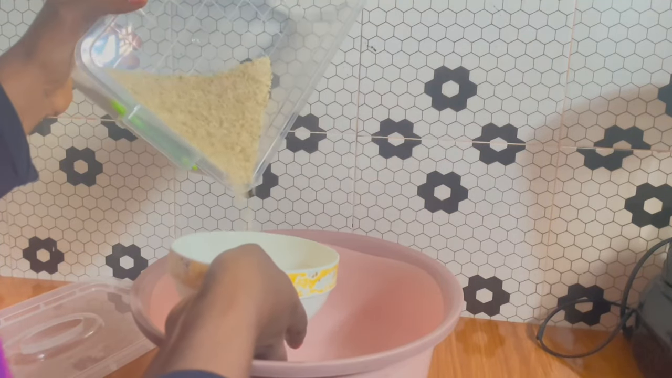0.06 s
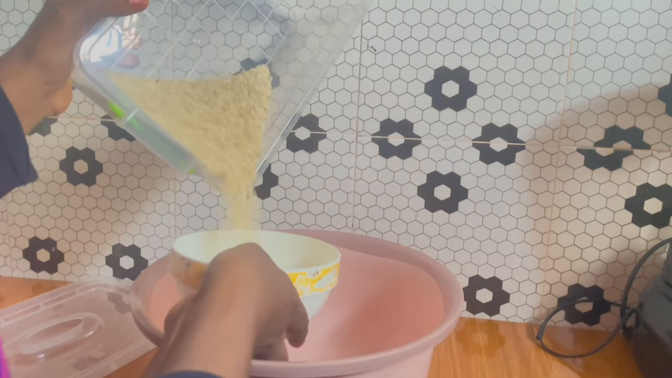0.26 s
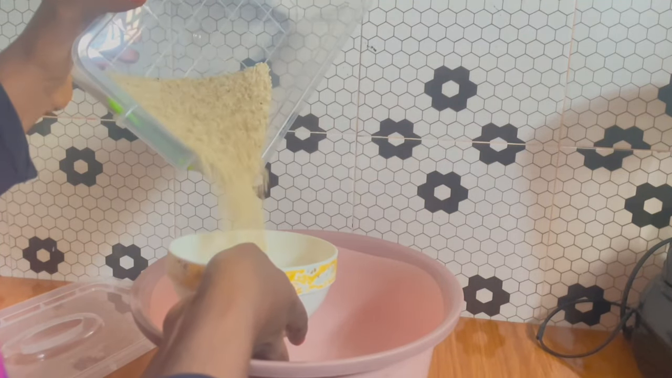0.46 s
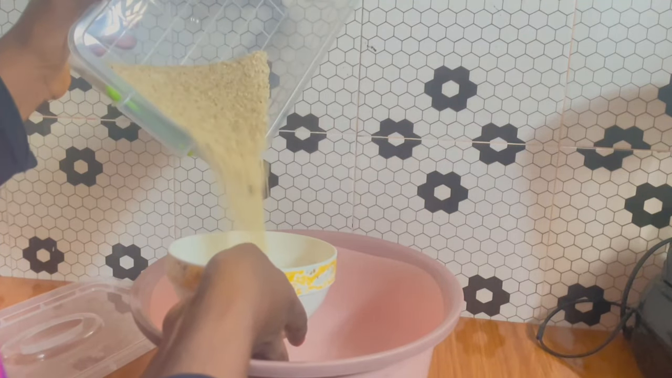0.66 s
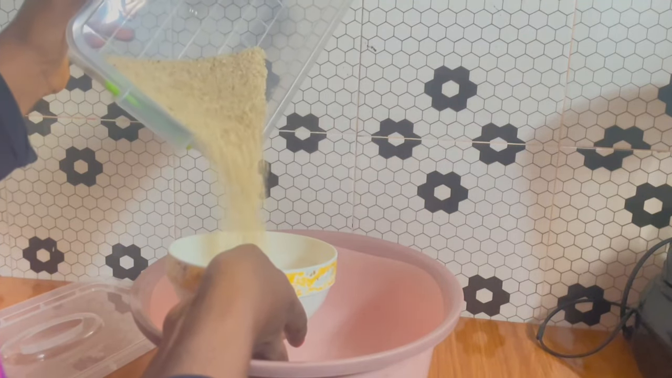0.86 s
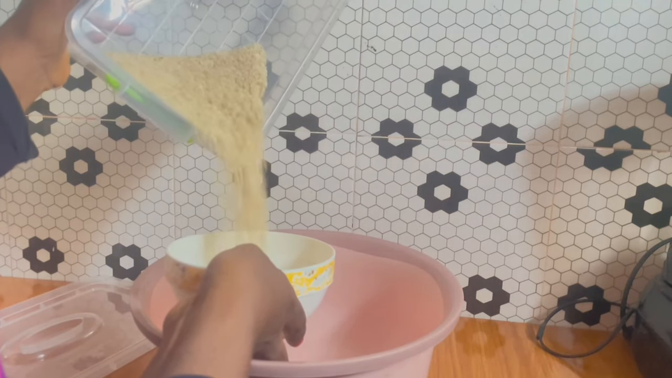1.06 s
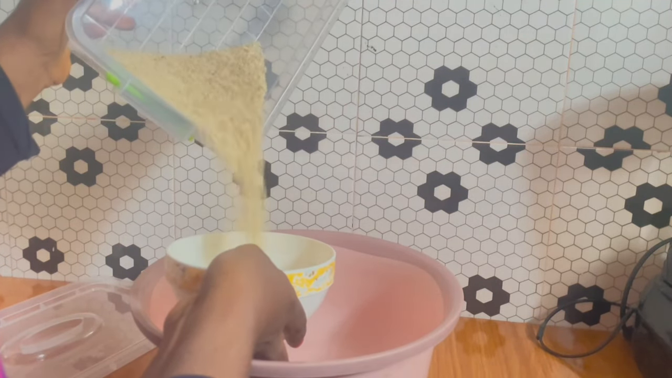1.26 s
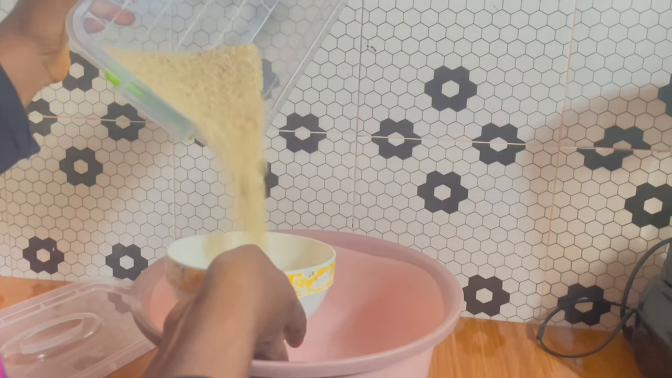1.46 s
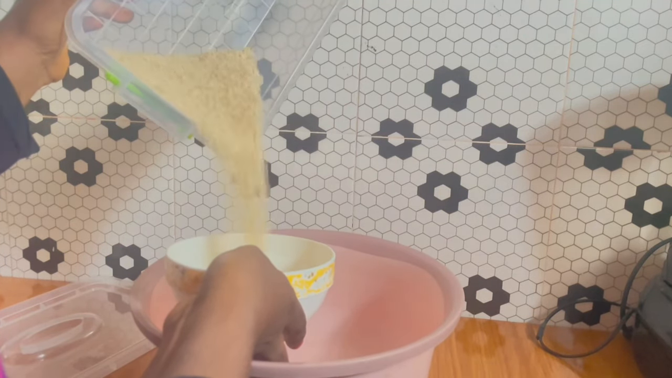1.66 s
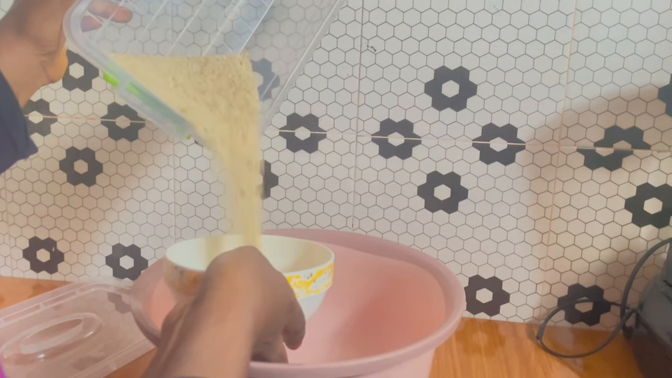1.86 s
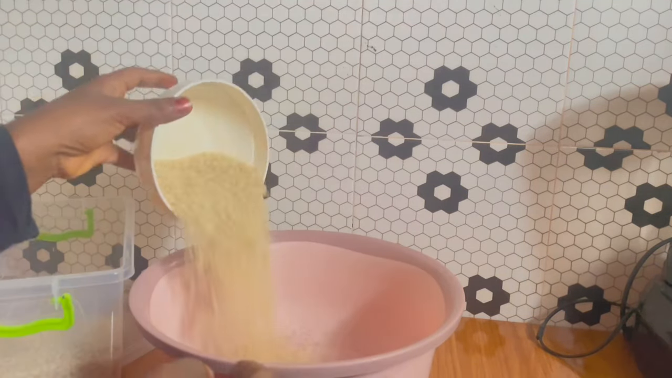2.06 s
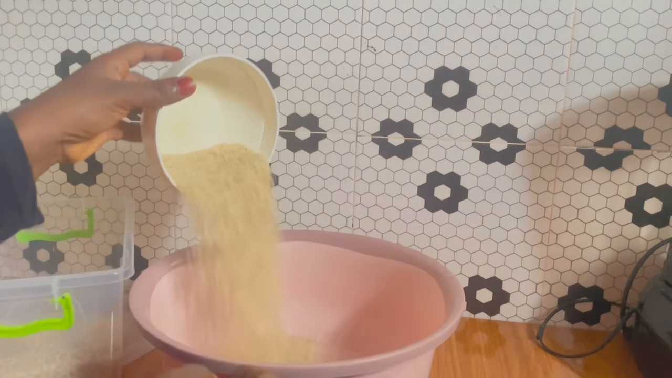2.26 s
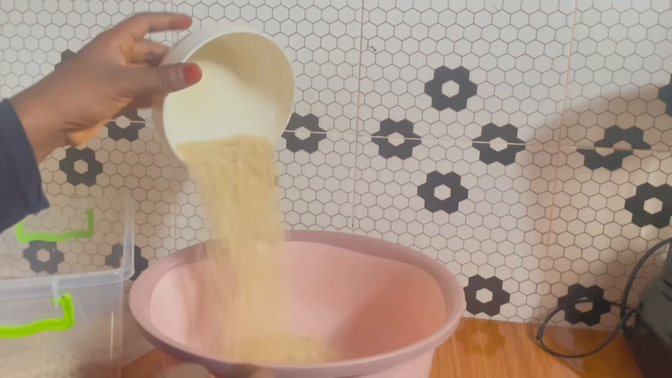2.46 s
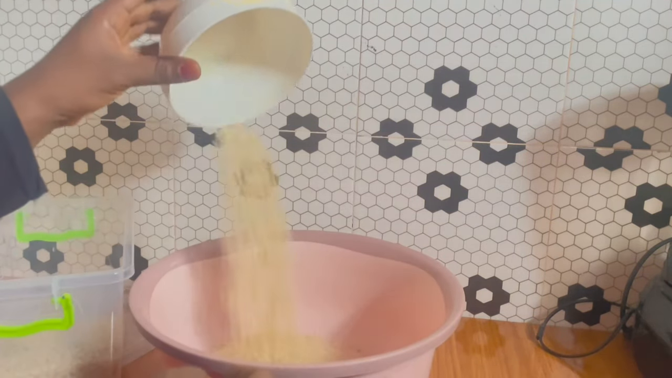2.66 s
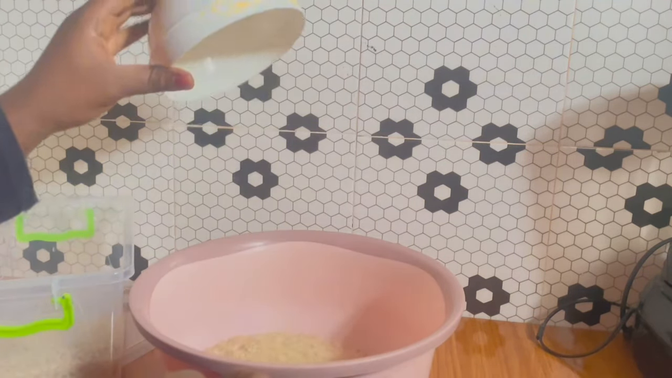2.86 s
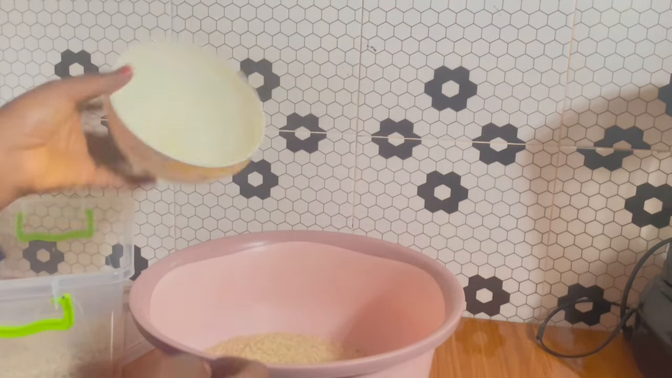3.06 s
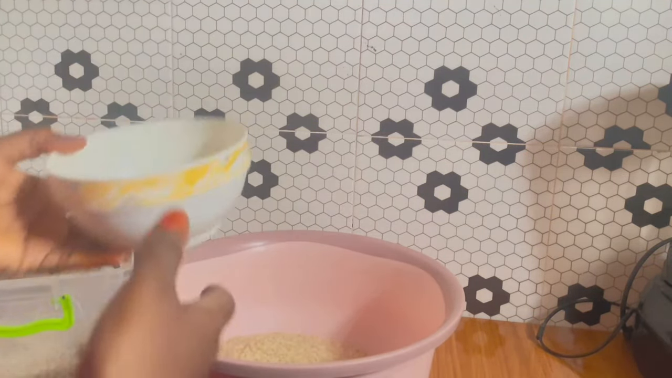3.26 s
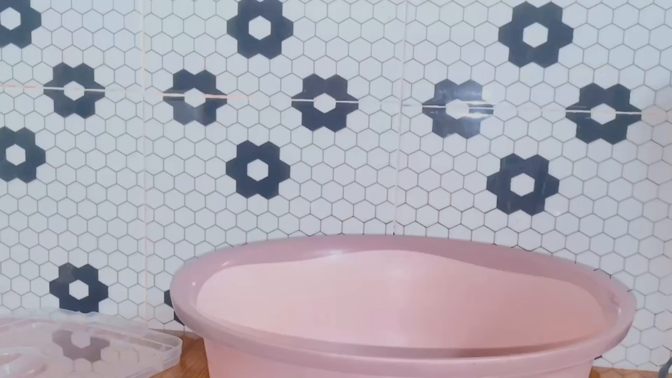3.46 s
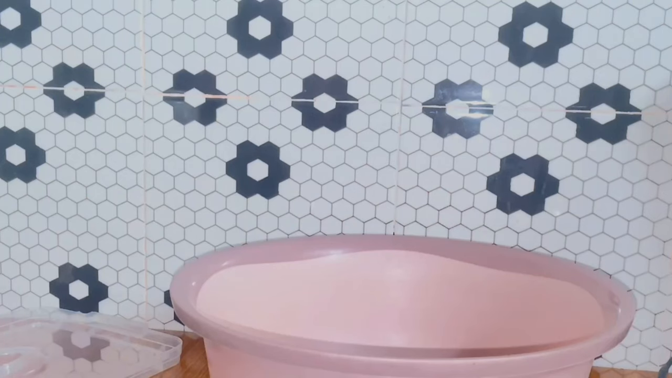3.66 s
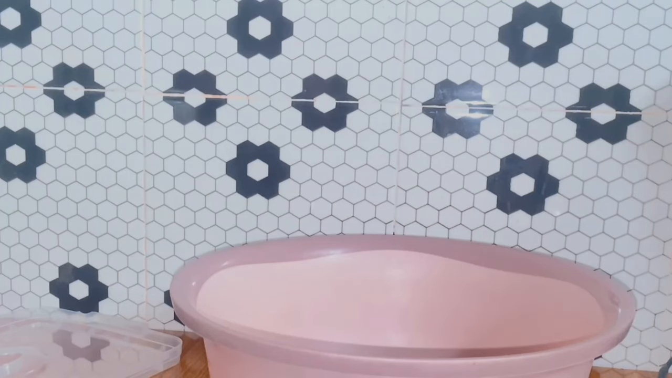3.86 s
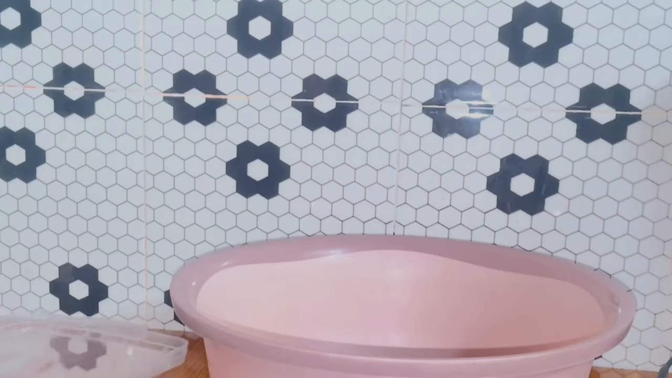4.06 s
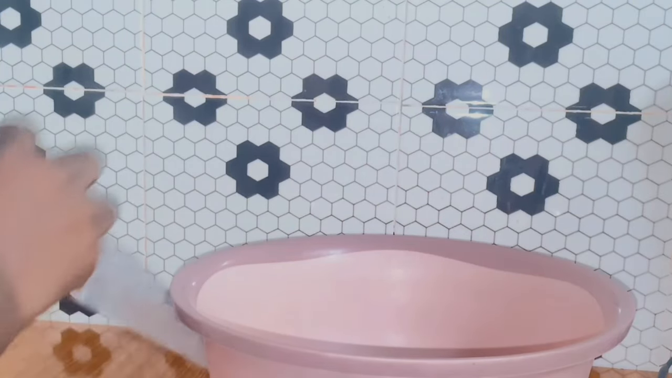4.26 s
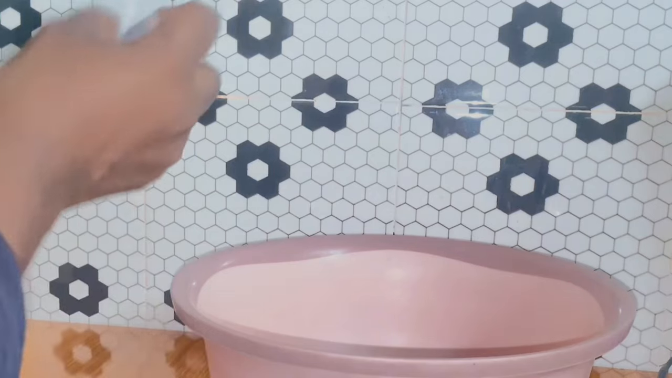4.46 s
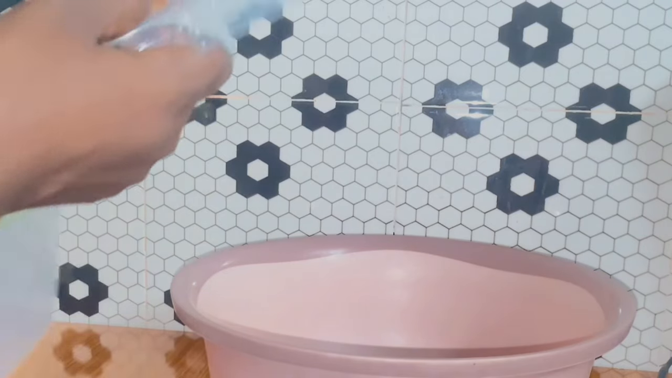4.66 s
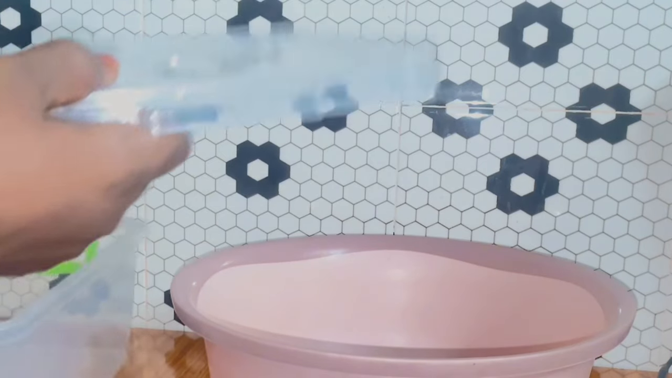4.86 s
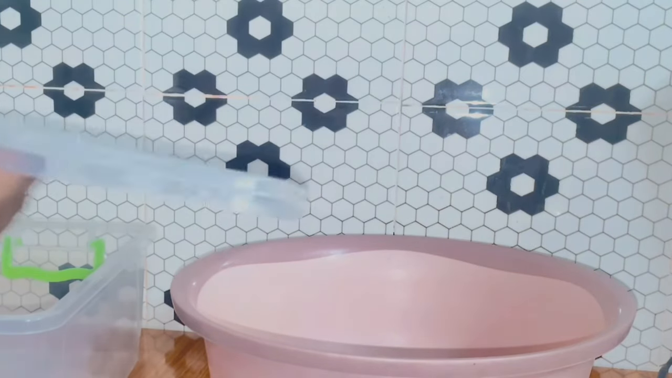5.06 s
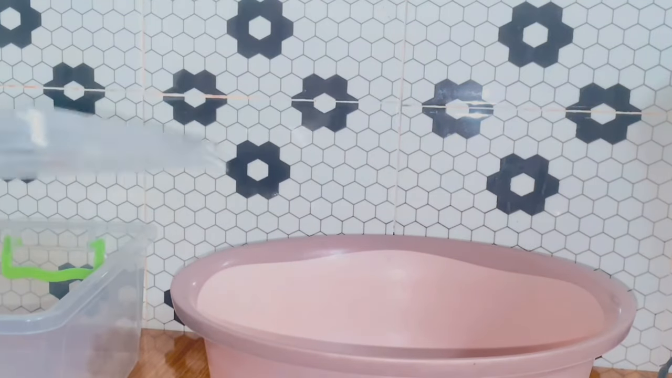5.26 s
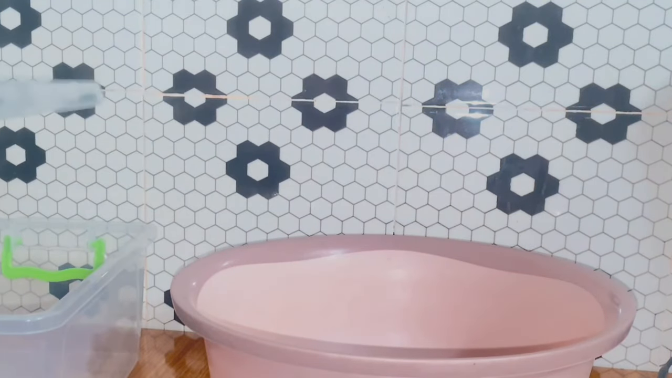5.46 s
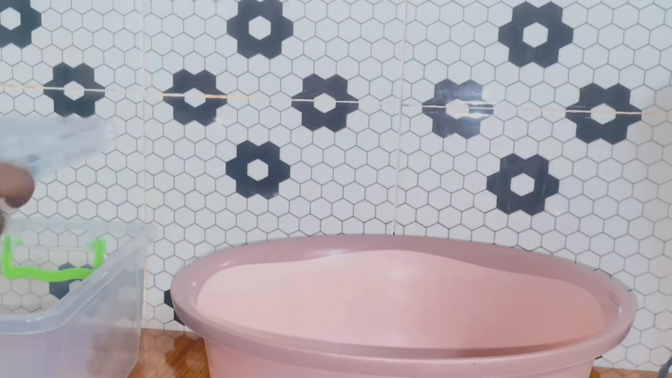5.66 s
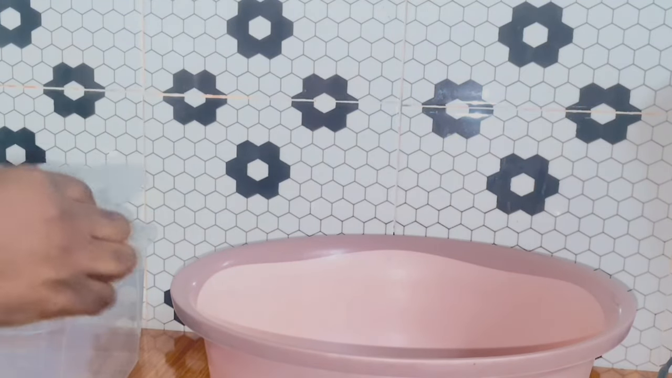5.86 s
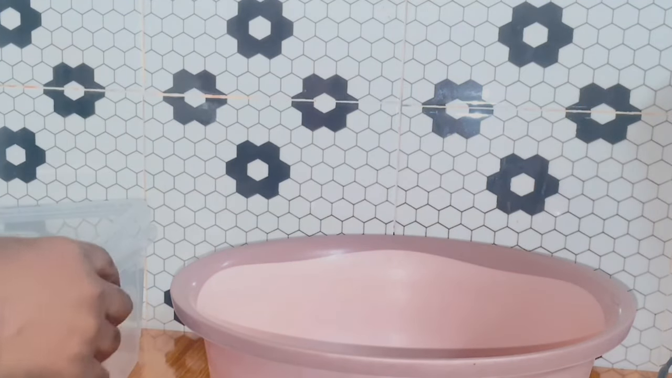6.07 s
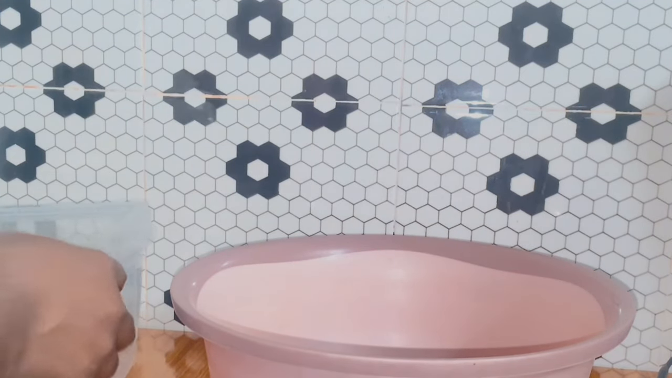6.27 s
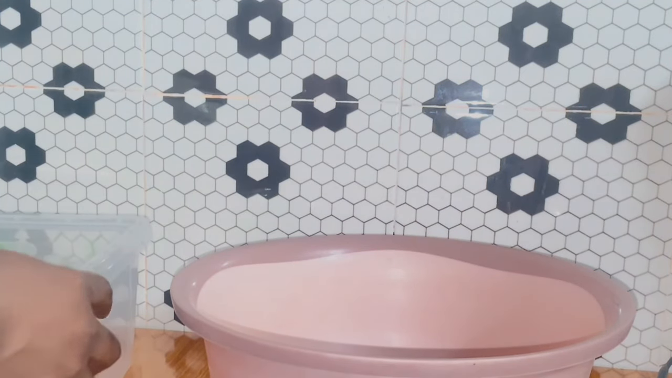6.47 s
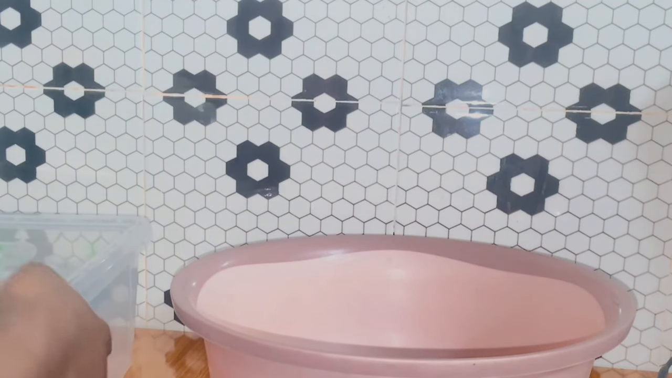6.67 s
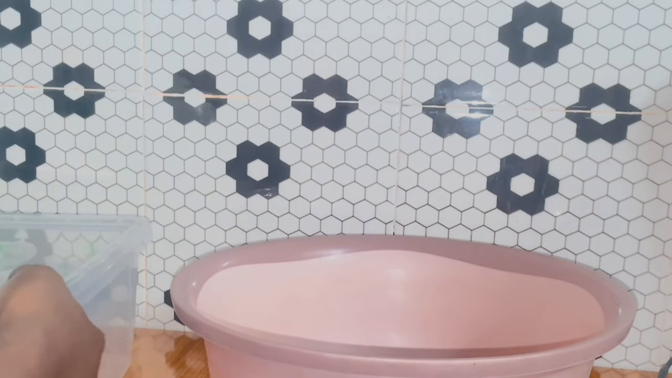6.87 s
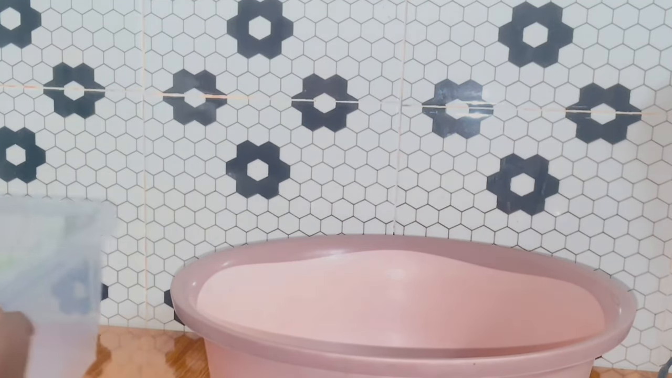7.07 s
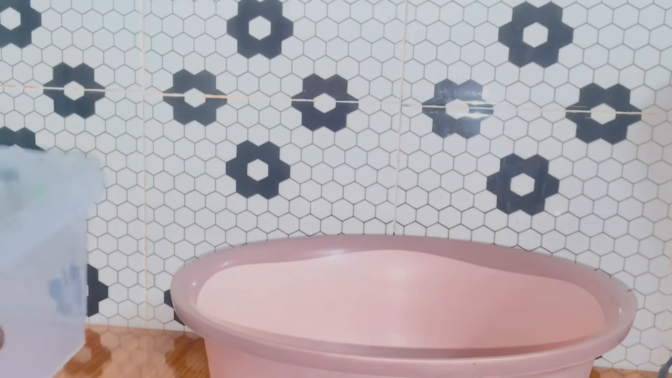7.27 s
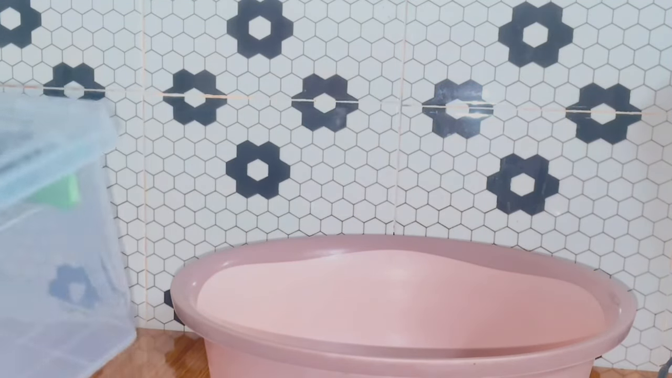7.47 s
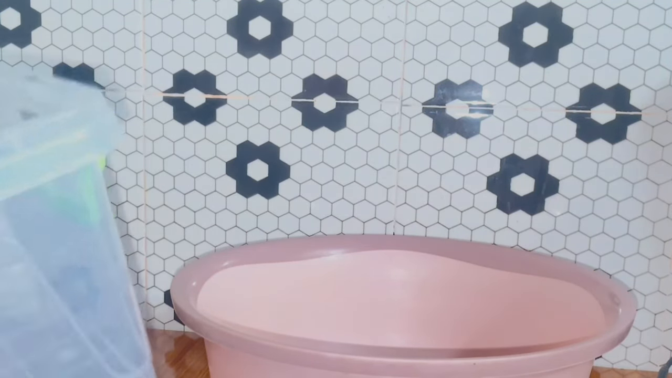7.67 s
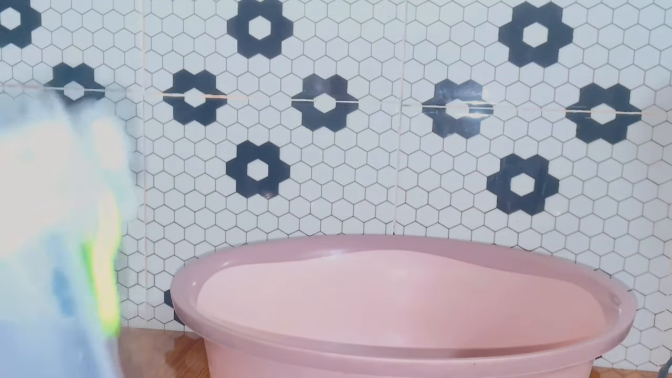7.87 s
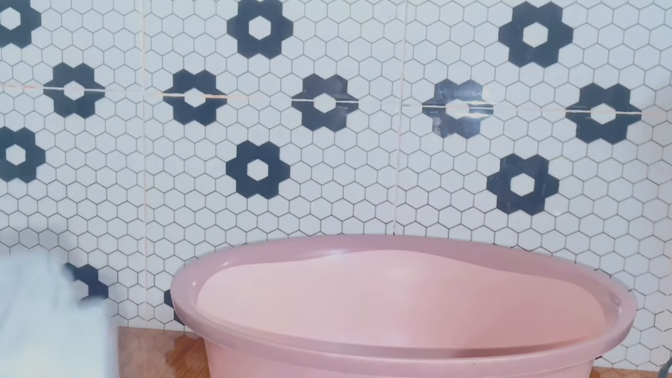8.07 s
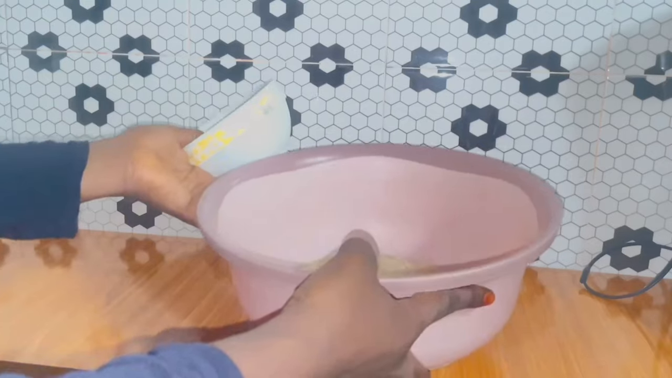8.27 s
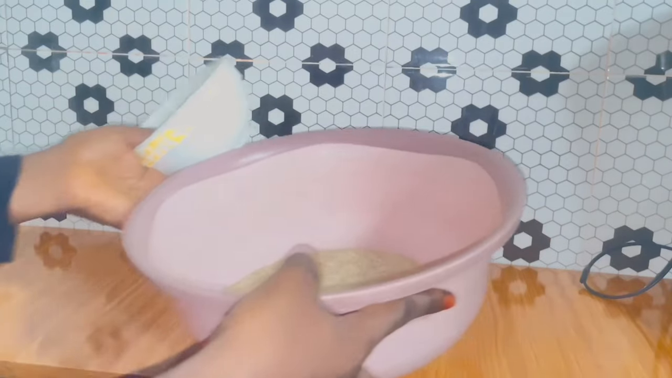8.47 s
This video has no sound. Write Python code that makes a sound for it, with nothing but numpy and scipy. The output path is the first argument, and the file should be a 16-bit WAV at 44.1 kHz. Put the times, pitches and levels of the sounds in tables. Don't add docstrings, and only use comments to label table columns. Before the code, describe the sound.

Close phone pickup of kitchen work: grains trickle into a ringing bowl, surge, thin to a steady patter, then crash into a hollow plastic basin and die away. Next come light lid clicks, sharp flexing cracks, a heavy double snap, box knocks and thumps, faint plastic squeaks and hand rubbing, then one bowl knock on the basin. Hard tiles reflect the blows; the pauses are almost silent.

```python
import sys
import numpy as np
from scipy import signal
from scipy.io import wavfile
from scipy.ndimage import uniform_filter1d

SR = 44100
rng = np.random.default_rng(int(sys.argv[2]) if len(sys.argv) > 2 else 0)


def gain_from_decibels(decibels):
    exponent = np.asarray(decibels, float) / 20
    return 10 ** exponent


def transcribe(signal):
    frames = np.atleast_2d(signal).T
    limited = np.clip(frames, -1, 1)
    pcm = np.round(limited * 32767).astype(np.int16)
    wavfile.write(sys.argv[1], SR, pcm)


N = 375732


def evened(x):
    return x / np.sqrt(np.mean(x ** 2) + 1e-20)


def read(points, hz):
    f, value = np.transpose(points)
    return np.interp(np.log(hz + 1), np.log(f + 1), value)


def colour(points):
    half = read(points, np.fft.rfftfreq(8192, 1 / SR)) * np.log(10) / 20
    log_gain = np.concatenate([half, half[-2:0:-1]])
    taps = np.fft.ifft(np.exp(np.conj(signal.hilbert(log_gain)))).real[:4096]
    return taps / np.linalg.norm(taps)


def ring(modes):
    t = np.arange(6000) / SR
    taps = np.zeros(6000)
    for k, (hz, width, db) in enumerate(modes):
        decay = np.sqrt(width) * np.exp(-np.pi * width * t)
        taps += (-1) ** k * gain_from_decibels(db) * decay * np.sin(2 * np.pi * hz * t)
    return taps / np.linalg.norm(taps)


def through(x, taps):
    return signal.oaconvolve(x, taps)[:N]


def wander(size):
    return evened(uniform_filter1d(uniform_filter1d(rng.standard_normal(N), size), size))


def grains(per_s, spread_db, clump_db):
    size = gain_from_decibels(spread_db * np.minimum(rng.exponential(1, N), 5) + clump_db * wander(size=500))
    landed = rng.random(N) < per_s / SR
    return evened(size * rng.choice([-1., 1.], N) * landed)


def level(rows):
    s, db = np.transpose(rows)
    return np.interp(np.arange(N) / SR, s, db, left=-200, right=-200)


def step(at_s, width_s):
    return .5 + .5 * np.tanh((np.arange(N) / SR - at_s) / (2 * width_s))


def away(at_s, rise_s, fall_s):
    t = np.arange(N) / SR - at_s
    return np.maximum(-t / rise_s, t / fall_s)


def pour(flow_db, vessels, per_s, spread_db, clump_db):
    # frequency in Hz, level of the click of grain on grain in dB
    grain_tone = [(300, -25), (1000, -10.5), (2200, -12.5), (3000, -0.5), (4200, 0), (6800, -2.5),
                  (11000, 1), (15500, -4)]
    patter = through(grains(per_s, spread_db, clump_db), colour(grain_tone))
    hush = through(rng.standard_normal(N), colour(grain_tone))
    struck = np.zeros(N)
    for db, modes in vessels:
        struck += gain_from_decibels(db) * through(grains(per_s, spread_db, clump_db), ring(modes))
    return gain_from_decibels(flow_db + 6.0) * (0.79 * patter + 0.36 * hush) + gain_from_decibels(-1.5) * struck


def rice():
    # time in seconds, level in dB
    bowl_flow = [(0.0, -49), (0.09, -58), (0.097, -45), (0.23, -35.5), (0.37, -30.5), (0.49, -35),
                 (0.66, -44), (0.81, -46), (2.1, -46)]
    basin_flow = [(2.106, -31.5), (2.144, -31), (2.314, -37.5), (2.4, -42), (2.6, -40), (2.894, -39),
                  (3.06, -52), (3.16, -69), (3.36, -92)]
    # time in seconds, extra flow in dB
    surges = [
        (.015, 7),
        (.365, 2.5),
        (.9, 4.5),
        (1.23, 5.5),
        (1.64, 5),
        (1.9, 3),
        (2.09, 1),
        (2.51, 0.5),
        (2.6, 1),
    ]
    # frequency in Hz, width in Hz, level in dB
    bowl_modes = [(745, 30, -3), (930, 150, -5.5), (700, 90, -8), (1365, 60, -14), (1480, 80, -18),
                  (1850, 90, -15.5), (2430, 60, -14), (2640, 250, -11), (2850, 100, -11)]
    basin_modes = [(552, 83, 1.5), (855, 37, -2), (988, 55, -3), (1605, 42, -4.5), (1777, 38, -2),
                   (2444, 400, 5.5)]
    heap_modes = [(590, 110, 4), (860, 220, 3), (1330, 560, -7.5)]

    surge = sum(db * np.exp(-away(s, rise_s=0.01, fall_s=0.074)) for s, db in surges)
    first = level(bowl_flow) + surge
    second = level(basin_flow) + surge
    wall_db = first + 2 - 13 * step(.74, .07)
    rim_db = first - 5.5 - 15 * step(0.87, .04)
    heap_db = -55 + .4 * (first + 46) - 13 * (1 - step(.4, .06))
    bowl = [(wall_db, bowl_modes[:3]), (rim_db, bowl_modes[3:]), (heap_db, heap_modes)]
    into_bowl = pour(first, bowl, per_s=7000, spread_db=1.7, clump_db=1.9)
    into_basin = pour(second, [(second - 0.27, basin_modes)], per_s=12000, spread_db=1.55, clump_db=1.0)
    bowl_cut = signal.butter(3, 560, "high", fs=SR)
    return signal.lfilter(*bowl_cut, into_bowl) + into_basin


def air(blows):
    # time in seconds, level in dB
    quiet_db = [(0, -60.5), (.6, -60), (1.3, -55.5), (1.9, -58.5), (2.3, -53), (2.85, -55.5), (3.28, -62),
                (3.84, -72.5), (4.7, -60), (5.1, -64.5), (5.33, -73), (5.5, -67), (5.9, -67.5), (6.62, -61),
                (6.82, -69.5), (7.3, -66), (8.07, -69), (8.52, -76)]
    # frequency in Hz, level in dB
    rumble_tone = [(20, -8), (45, -9), (70, 2), (100, -9), (130, -2.5), (165, -20), (250, -40.5)]
    murk_tone = [(100, -39.5), (170, 2), (350, -0.5), (600, -5), (1000, -16), (2000, -24.5), (5000, -46.5),
                 (16000, -50)]
    hiss_tone = [(300, -10), (900, 0), (1700, -4), (2200, -25), (7000, -25), (11500, -13), (15000, -17)]

    keep = np.exp(-1 / (0.049 * SR))
    power = signal.lfilter([(1 - keep) ** 2], [1, -2 * keep, keep ** 2], blows ** 2)
    held = np.sqrt(power + 1e-14)
    quiet = gain_from_decibels(level(quiet_db))
    rumble_gain = np.minimum(quiet + gain_from_decibels(-35) * held, gain_from_decibels(-46.5))
    murk_gain = gain_from_decibels(-0.46) * quiet + gain_from_decibels(-16.5) * held
    rumble = through(rng.standard_normal(N), colour(rumble_tone)) * gain_from_decibels(5.0 + 1.5 * wander(size=3000))
    murk = through(rng.standard_normal(N), colour(murk_tone)) * gain_from_decibels(-3.0 + 0.69 * wander(size=1500))
    hiss = through(rng.standard_normal(N), colour(hiss_tone))
    return rumble_gain * rumble + murk_gain * murk + gain_from_decibels(-80) * hiss


def parts(force_db, depth_db, hard_db, tick_db):
    thump_wall_crack_tick = np.array([depth_db + 23, 16, hard_db + 25.5, hard_db + tick_db + 17.5])
    return gain_from_decibels(force_db + thump_wall_crack_tick)[:, None]


def knocks():
    # time in seconds, force in dB, depth in dB, hardness in dB, contact in seconds
    slaps = [(.022, -55, -12, -3, .0041), (3.698, -40.5, -9.5, -21.5, 0.013),
             (3.909, -37.5, -12, -16.5, 0.013), (4.486, -19.5, -7.5, -22, 0.021),
             (4.897, -16, -6, -25.5, 0.003), (4.904, -11, -11, -29, 0.015), (6.272, -19, -1, -17, 0.02),
             (6.299, -35.5, 11.5, -0.5, 0.044), (6.578, -42, 0, -14, 0.0064), (7.107, -45, -2, -8, 0.003),
             (7.441, -41, 0, -14.5, 0.011), (7.64, -48, 0, -26, 0.0024), (8.05, -47, 1, -28, .004),
             (8.241, -17, -14.5, -25, 0.007)]
    clicks = [
        (3.517, -25, -9, -24, 0.008),
        (3.589, -24, -9, -15, 0.0067),
        (4.1505, -14, -11, -15, 0.007),
        (4.569, -28.5, -1, -46, 0.034),
        (5.029, -29, -14, -24, 0.011),
        (5.422, -26, -4, -14.5, 0.01),
        (5.469, -37, -7, -15.5, .008),
        (5.973, -18.5, -3.5, -12.5, 0.006),
        (8.312, -31, -15, -30, 0.009),
        (8.35, -38, -16, -14, 0.035),
    ]
    cracks = [
        (.096, -53.5, -9, 5, 0.017),
        (3.561, -38, 2.5, -14, .012),
        (3.928, -20.5, -12.5, -13.5, .012),
        (3.99, -28.5, -1.5, -12.5, .0087),
        (4.195, -19, -12, 1, 0.004),
        (4.266, -18, -19, 0, .003),
        (4.338, -23, -5, -14.5, 0.0046),
        (4.9455, -11, -15, -15, 0.0076),
        (6.04, -35.5, 10, -1.5, .011),
        (8.254, -37, -2.5, -3.5, 0.0058),
    ]
    # time in seconds, force in dB, depth in dB, hardness in dB, swell in seconds
    scrapes = [(3.395, -47, -15, -5, 0.024), (4.658, -54.5, 19, -1.5, .017), (5.22, -69, 24, -6.5, .011),
               (5.37, -49, -.6, 1.3, 0.011), (5.585, -52.5, -8, -4, 0.015), (5.692, -45, -12, -6, 0.041),
               (5.79, -47.5, -5, -19, .0083), (5.874, -62.5, 13, 6, 0.013),
               (4.79, -39.5, -2.5, -23.5, 0.029), (6.931, -40.5, -2.5, -20.5, 0.037),
               (6.968, -42, 0, -16.5, 0.0062), (7.185, -61.5, 13, 8, 0.015), (7.26, -42, 0, -18, .018),
               (7.725, -43.5, 1, -16.5, 0.038), (7.841, -64, -2, -15, .021), (8.43, -52, -24, -1, .011),
               (5.998, -14.5, -4, -15, .015), (7.92, -62, -8, -26, .04), (8.06, -61, -4, -26, .04),
               (7.316, -33, -5, -22, .004), (7.283, -48, 0, -20, .005), (6.266, -32, 0, -14, .006)]
    # frequency in Hz, width in Hz, level in dB
    thump_modes = [(73.6, 39, -18.5), (143, 25, -4), (191.8, 22, -3), (274, 74, 1.5), (344, 16, 1),
                   (430, 73, 0)]
    wall_modes = [(539, 60, -1), (608, 60, 0.5), (700, 94, 1.5), (770, 80, 0), (914, 80, -2.5),
                  (949, 76, -2), (1280, 610, -3)]
    # frequency in Hz, level in dB
    crack_tone = [(600, -29), (1100, 0.5), (1500, 1.5), (2200, -0.5), (3100, -2.5), (4000, -7), (5500, -16),
                  (7500, -23.5)]
    tick_tone = [(3000, -10.5), (4500, 1), (5800, -5.5), (7000, -4), (11000, -11), (15500, -24)]

    drive = np.zeros((4, N + 8000))
    t = np.arange(8000) / SR
    for rows, tick_db in (clicks, 7.5), (slaps, -0.5), (cracks, -15):
        for s, force, depth, hard, contact in rows:
            shake = rng.standard_normal((4, 8000)) * np.exp(-t / contact)
            rattle = shake / np.linalg.norm(shake, axis=1, keepdims=True)
            blow = 0.65 * (t == 0) + rattle
            drive[:, round(s * SR):][:, :8000] += parts(force, depth, hard, tick_db) * blow
    for s, force, depth, hard, swell in scrapes:
        stroke = t * np.exp(-t / swell)
        scrape = rng.standard_normal((4, 8000)) * stroke / np.linalg.norm(stroke)
        drive[:, round(s * SR):][:, :8000] += parts(force, depth, hard, tick_db=5.5) * scrape
    bodies = ring(thump_modes), ring(wall_modes), colour(crack_tone), colour(tick_tone)
    return sum(through(d, body) for d, body in zip(drive, bodies))


def sings(rows, base_rough):
    out = np.zeros(N + 12000)
    t = np.arange(12000) / SR
    for s, db, hz, swell in rows:
        rough = base_rough + .11 * hz / 1000
        stroke = t / swell * np.exp(1 - t / swell)
        flutter = evened(uniform_filter1d(rng.standard_normal(12000), size=int(6 * SR / hz)))
        tone = (1 - rough + rough * flutter) * np.sin(2 * np.pi * hz * t)
        out[round(s * SR):][:12000] += gain_from_decibels(db) * stroke * tone
    return out[:N]


def singing_parts():
    # time in seconds, level in dB, frequency in Hz, swell in seconds
    clumps = [(.1, -37, 745, .012), (.14, -36, 750, .008), (.172, -31, 740, .006), (.195, -31, 755, .012),
              (.235, -28, 745, .006), (.262, -25, 745, .012), (.315, -27, 740, .012),
              (.338, -27, 770, .008), (.358, -19, 748, .008), (.385, -33, 760, .01), (.42, -30, 740, .01),
              (.445, -27, 760, .01), (.51, -31, 740, .012)]
    ringing = [(3.553, -31, 540, 0.0066), (3.595, -38, 677, .006), (3.695, -42, 697, 0.0065),
               (3.928, -29.5, 1377, 0.0054), (4.156, -29, 264, .006), (4.151, -23, 738, .005),
               (4.151, -26, 1300, .004), (4.195, -15, 3300, 0.0025), (4.195, -15, 2330, .0025),
               (4.196, -22, 1260, .005), (4.2, -28, 339, .01), (4.195, -20, 1900, .002),
               (4.196, -22, 4200, .002), (4.266, -11, 3130, 0.0025), (4.266, -18, 522, .004),
               (4.266, -18, 2080, .003), (4.267, -20, 2450, .004), (4.31, -30, 560, .02),
               (4.487, -29, 571, .01), (4.488, -36, 1100, .01), (4.57, -36, 400, .015),
               (4.8955, -8.5, 860, .002), (4.9451, -10, 760, .002), (4.908, -24, 480, .005),
               (4.995, -22, 850, .008), (4.897, -16, 1050, .002), (5.028, -30, 680, .003),
               (4.946, -22.5, 2410, 0.0021), (4.955, -22, 1000, 0.0081), (5.385, -48, 480, 0.0069),
               (5.422, -36, 1400, 0.003), (5.443, -40, 1230, .004), (5.495, -40, 400, .01),
               (5.44, -37.5, 423, 0.017), (5.973, -25.5, 620, 0.0035), (6.007, -21, 777, 0.0078),
               (6.02, -25, 430, 0.012), (6.28, -27, 526.5, 0.01), (6.35, -35, 343, .03),
               (6.285, -36, 1600, .006), (6.97, -48, 380, .015), (7.322, -37, 300, 0.0053),
               (7.443, -43.5, 341, 0.014), (7.641, -43.5, 420, 0.0034), (8.243, -21, 450, 0.0045),
               (8.26, -36, 603, 0.011)]
    booms = [(3.52, -33, 88, 0.0084), (3.615, -38, 111, 0.009), (3.915, -35, 80.7, 0.013),
             (4.345, -27, 132.6, 0.021), (4.501, -31.5, 191, 0.018), (5.458, -39, 72, 0.019),
             (5.98, -40, 68, 0.04), (6.101, -36, 75.5, 0.018), (6.83, -57, 270, 0.024),
             (7.315, -40.5, 170, 0.0072), (8.27, -43, 69.4, 0.037), (6.57, -60, 202, 0.0107)]
    squeaks = [(3.4, -47, 3350, .009), (3.96, -45, 2150, .008), (4.487, -37, 2120, .012),
               (4.675, -51, 1170, .03), (4.73, -62, 1950, .01), (5.59, -58, 3100, .008),
               (6.44, -53, 975, .035), (6.41, -59, 1950, .03), (6.62, -63, 980, .02),
               (7.108, -58, 2300, .003), (7.21, -56, 1050, .025), (7.2, -63, 1650, .02),
               (5.972, -33, 5300, .003), (8.44, -55, 1700, .006), (8.44, -57, 2600, .005),
               (5.376, -50, 2450, .006), (5.374, -54, 4000, .006), (5.374, -56, 1450, .005),
               (5.38, -56, 3200, .008), (6.01, -36, 3150, .006)]
    return sings(ringing + booms + clumps, base_rough=.15) + sings(squeaks, base_rough=.22)


def tail():
    # frequency in Hz, time to fall by 60 dB in seconds
    decay_times = [(100, 0.76), (400, 0.38), (1000, 0.4), (2800, 0.37), (7000, 0.31), (15000, 0.27)]
    taps = np.zeros(SR // 2)
    at = np.arange(260, len(taps) - 20, 20)
    taps[at + rng.integers(0, 20, len(at))] = rng.choice([-1., 1.], len(at))
    hz, t, z = signal.stft(taps, SR, nperseg=256)
    fall_db = -60 * t / read(decay_times, hz)[:, None]
    suppressed_db = -400 * t ** 2
    echo = signal.istft(z * gain_from_decibels(fall_db + suppressed_db), SR, nperseg=256)[1]
    return echo / np.linalg.norm(echo)


def kitchen(x):
    turn = 2 * np.pi * 3.7 * np.arange(N) / SR
    return through(x * np.cos(turn), tail()) + through(x * np.sin(turn), tail())


def rub():
    # time in seconds, level in dB, time to rise 20 dB in seconds, time to fall 20 dB in seconds
    rub_strokes = [(3.13, -66, .05, .3), (3.225, -70, .01, .05), (3.415, -58, .04, .1),
                   (3.52, -52, .004, .08), (8.25, -52, .005, .2), (3.6, -40, .007, .04),
                   (3.99, -56, .02, .15), (4.13, -62, .1, .1), (4.49, -52.5, .05, .3),
                   (5.13, -63, .05, .15), (5.55, -62, .03, .15), (5.61, -60, .04, .08), (5.75, -57, .1, .2),
                   (5.89, -58, .04, .06), (6.26, -58, .03, .03), (6.38, -58, .2, .05),
                   (6.61, -61, .05, .18), (7.0, -61, .06, .07), (7.205, -63, .02, .08),
                   (7.45, -60, .09, .2), (7.77, -64, .05, .18), (8.44, -53.5, .03, .12)]
    # frequency in Hz, level in dB
    rub_tone = [(500, -10.5), (1200, 0.5), (3500, 3), (7000, -9.5), (11000, -5.5), (15500, -12.5)]
    strokes = sum(gain_from_decibels(db - 20 * away(s, rise, fall)) for s, db, rise, fall in rub_strokes)
    patchy = gain_from_decibels(-1.5 + 1.8 * wander(size=1500))
    slips = through(grains(per_s=5000, spread_db=2.2, clump_db=2.7), colour(rub_tone))
    return strokes * patchy * slips


def scene():
    low_cut = signal.butter(2, 60, "high", fs=SR)
    hits = signal.lfilter(*low_cut, knocks())
    tones = singing_parts()
    echoes = kitchen(hits + .4 * tones)
    return (rice() + 0.8 * hits + tones + gain_from_decibels(-2.0) * echoes + rub() + air(hits))[None]


def thin_treble(x):
    # lower edge in Hz, upper edge in Hz, share of time empty
    empty_bands = [(7550, 8000, .3), (8000, 8300, .45), (8300, 9250, .92), (9250, 9600, .75),
                   (9600, 10000, .3), (10000, 10350, .15), (14500, 14900, .08), (15200, 15800, .15)]
    # frequency in Hz, level in dB
    gate_floor = [(500, -120), (13000, -120), (14200, -104), (16000, -100)]
    hz, t, z = signal.stft(x, SR, nperseg=1024, noverlap=768)
    luck = rng.random((len(t) // 7 + 1, len(empty_bands)))
    luck = np.repeat(luck, 7, axis=0)[:len(t)]
    for k, (low, high, share) in enumerate(empty_bands):
        z[:, (hz >= low) & (hz < high)] *= luck[:, k] > share
    power = uniform_filter1d(uniform_filter1d(abs(z) ** 2, size=7, axis=1), size=5, axis=2)
    faint = power < gain_from_decibels(read(gate_floor, hz))[:, None] ** 2
    z *= np.where(faint & (hz[:, None] > 450), .25, 1)
    return signal.istft(z, SR, nperseg=1024, noverlap=768)[1][:, :N]


def band_limit(x):
    return signal.sosfilt(signal.butter(12, 16990, fs=SR, output="sos"), x)


def record(dry):
    # frequency in Hz, response in dB
    treble_response = [(20, -1.5), (7300, 1), (7700, -7), (8300, -6.5), (9000, -12.5), (9600, -7.5),
                       (10000, -2.5), (15600, -3.5), (16100, -52)]
    hz = np.linspace(0, SR / 2, 513)
    response_taps = signal.firwin2(1023, hz, gain_from_decibels(read(treble_response, hz)), fs=SR)
    heard = signal.oaconvolve(dry, response_taps[None], "same")
    return band_limit(thin_treble(heard))


dry = scene()
out = record(dry)
transcribe(out)
```